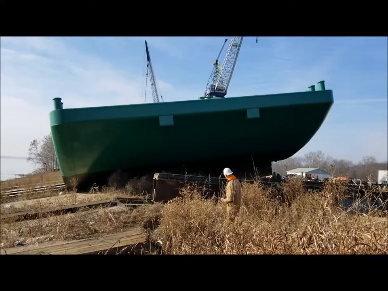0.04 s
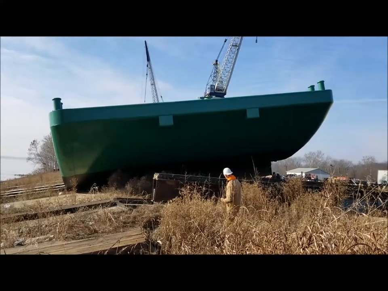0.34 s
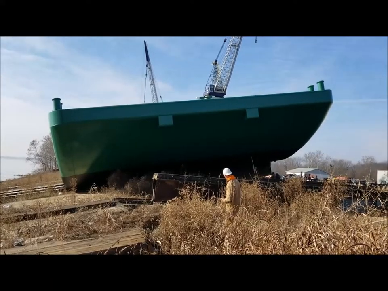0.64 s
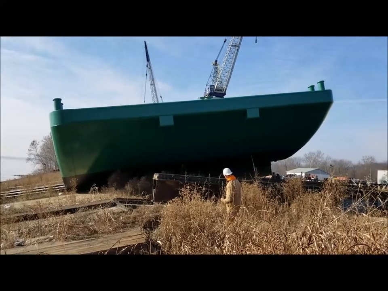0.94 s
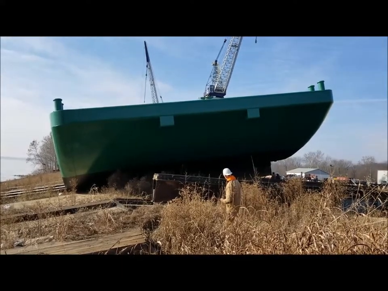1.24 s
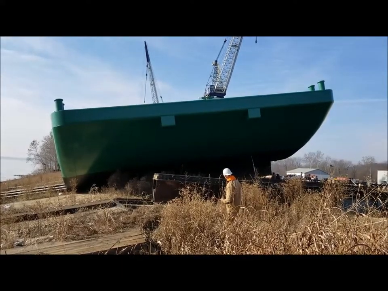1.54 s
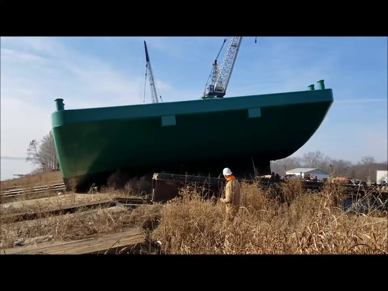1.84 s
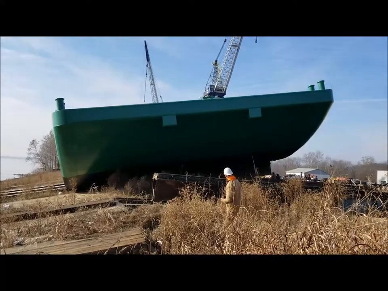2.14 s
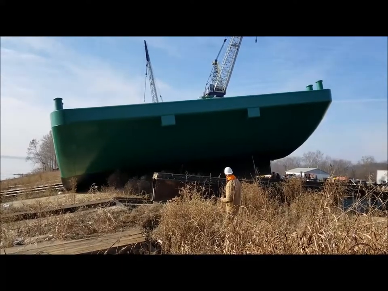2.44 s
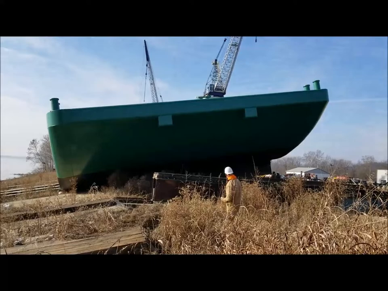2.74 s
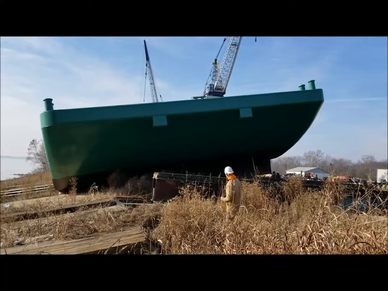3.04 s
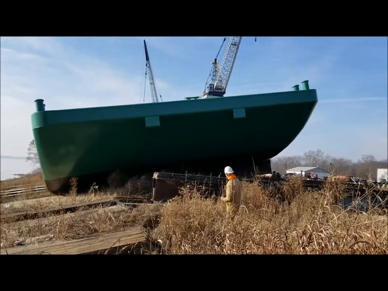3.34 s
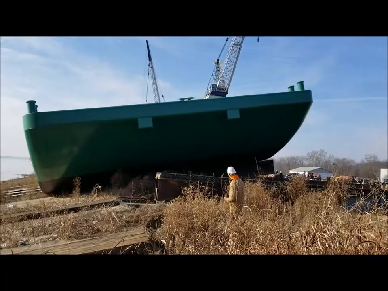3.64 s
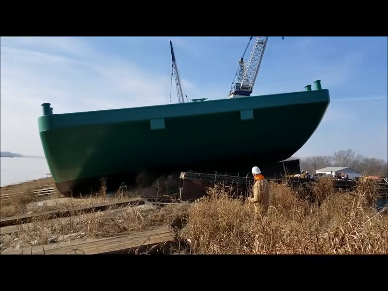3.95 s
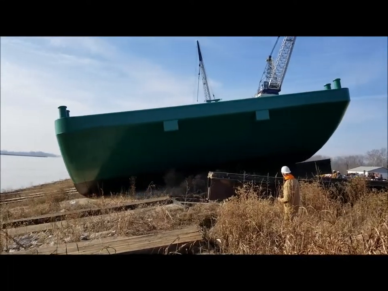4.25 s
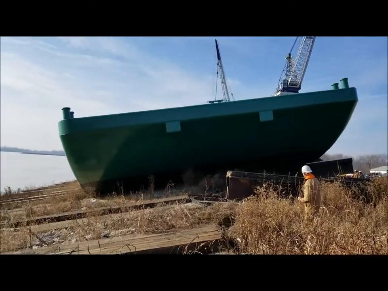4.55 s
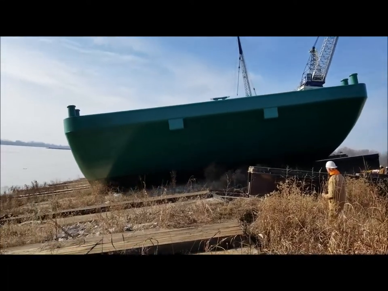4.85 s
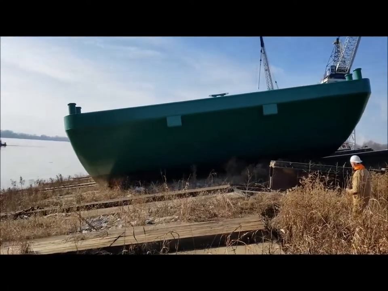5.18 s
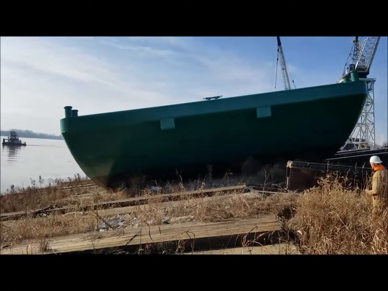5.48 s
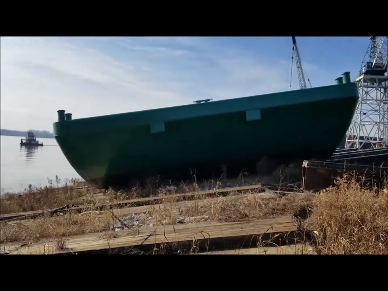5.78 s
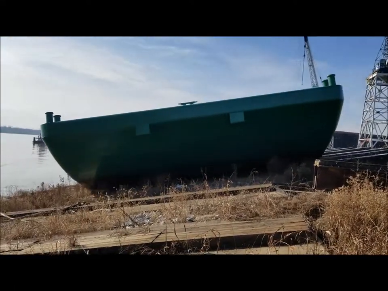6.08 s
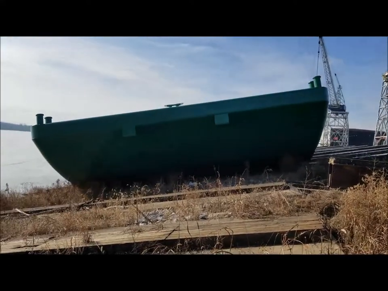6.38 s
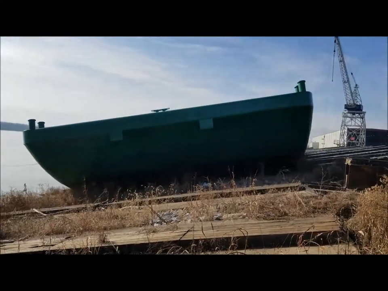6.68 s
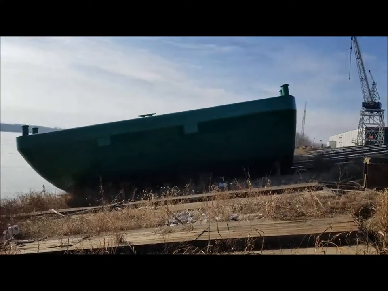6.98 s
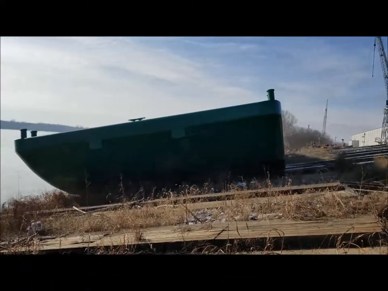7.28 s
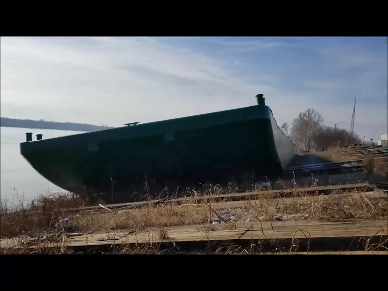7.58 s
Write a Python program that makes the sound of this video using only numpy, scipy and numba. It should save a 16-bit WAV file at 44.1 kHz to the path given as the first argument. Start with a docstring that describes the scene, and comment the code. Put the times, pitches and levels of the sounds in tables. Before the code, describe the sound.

A steel barge slides down timber ways with a thud, then a growing rumble, grinding scrapes and ringing bangs.

```python
"""Barge launch from a riverside yard.

A steel barge slides down timber ways, heard from the bank. Yard machinery hums; dry grass rustles close by.
The hull lets go with a thud. Stick-slip rumbles, grinds, scrapes and hisses, growing with speed and load.
Timbers crack; the hull bangs on them and its plates ring.
The left microphone is shaded: full bass, little treble, slightly late."""
import sys
import numpy as np
from scipy import signal
from scipy.fft import rfft, irfft, next_fast_len
from scipy.io import wavfile
from scipy.ndimage import uniform_filter1d, minimum_filter1d
from numba import njit

SR = 44100
rng = np.random.default_rng(int(sys.argv[2]) if len(sys.argv) > 2 else 0)


def generate_wav(sig):
    """Save sig (samples, or channels by samples) to the path in sys.argv[1] as 16-bit PCM at SR."""
    pcm = np.round(np.clip(np.atleast_2d(sig).T, -1, 1) * 32767).astype(np.int16)
    wavfile.write(sys.argv[1], SR, pcm)


N = 344862
TIME_S = np.arange(N) / SR

# noise spectra: f/Hz, relative density/dB
YARD_SPECTRUM = [(20, -31), (32, 4), (45, 8), (90, 3), (135, 3.5), (220, 0), (310, -5), (420, -10.5),
                 (700, -14.5), (1050, -17.5), (1450, -14), (2600, -21.5), (4800, -25.5), (8000, -30.5),
                 (16000, -45)]
BRUSH_SPECTRUM = [(800, -26), (2000, 3), (4000, 4), (6500, 2.5), (9000, -4.5), (16000, -18)]
CRACKLE_SPECTRUM = [(3000, -31), (7000, 10), (10000, 12), (14000, 7), (16000, -1)]
HISS_SPECTRUM = [(1500, -17), (4000, -1), (6000, 5), (8500, 2.5), (12000, 2.5), (16000, -5.5)]
GRIND_SPECTRUM = [(200, -39), (380, -4.5), (460, 0), (600, 3.5), (850, 2), (1050, -3), (1500, -7),
                  (2200, -16.5), (4000, -32)]
SCRAPE_SPECTRUM = [(700, -4), (1400, 0), (2200, 2.5), (3200, 2), (5500, -2), (8000, -5), (12000, -51)]
RUMBLE_SPECTRUM = [(20, -32), (35, -12), (55, -4), (100, 3), (150, 0), (200, -2), (250, -7), (330, -14),
                   (450, -27.5), (800, -43)]
SHUDDER_SPECTRUM = [(40, -25), (65, -14), (95, 1), (150, 0), (210, -1), (270, -13), (340, -16), (450, -30),
                    (800, -40)]
TREMOR_SPECTRUM = [(15, -42), (28, -4), (40, -1), (60, 4.5), (80, -1), (130, -43)]
# idling engine: f/Hz, level/dB
ENGINE_LINES = [(47.5, -51), (70, -44.5), (114, -49.5), (139, -47), (486, -57.5), (688, -63)]
# fan blade tones: harmonic, level/dB
FAN_HARMONICS = [(1, -38), (2, -50.5), (3, -62), (4, -52), (8, -63), (12, -63), (16, -68)]
# fan air noise: f/Hz, width/Hz, level/dB
FAN_BANDS = [(1460, 710, -56.5), (3570, 670, -59), (4940, 44, -79)]
# dry stalks: t/s, rise/s, brush/dB, crackle/dB, t60/s
RUSTLES = [(0.225, .004, -44, -62, 0.22), (0.772, 0.0035, -42, -48, 0.47), (0.905, .02, -60, -45, 0.17),
           (1.08, 0.044, -49, -49, 0.75), (1.21, 0.0021, -45.5, -46, 0.45), (1.342, .002, -58, -46, .08),
           (1.62, .04, -51, -55, 0.93), (1.823, 0.0017, -47, -41.5, 0.37), (1.975, .012, -45, -55, .3),
           (2.052, .004, -55, -43, 0.11), (2.104, .01, -40, -48, 0.22), (2.325, 0.013, -41, -45.5, 0.24),
           (2.57, .002, -38.5, -43, 0.16), (2.80, 0.005, -37.5, -40, 0.15), (3.06, 0.043, -41, -42, 0.74),
           (3.52, 0.044, -36, -36, 0.89), (4.33, 0.03, -22, -27, 0.24), (5.47, 0.036, -29, -27.5, 0.67)]
# hull speed on a log scale: t/s, level/dB
SPEED_CURVE = [(2.27, -69), (2.79, -62.5), (4.4, -50.5), (5.13, -52.5), (5.61, -49.5), (5.87, -48),
               (6.04, -46), (6.19, -45), (7.25, -47.5), (7.82, -45.5)]
# weight on the ways, jumping as the hull tips onto them: t/s, level/dB
LOAD_CURVE = [(2.03, -10), (2.35, -9), (2.8, -10.5), (3.2, -14), (3.62, -11.5), (3.69, -2), (4.1, 0),
              (4.55, -1.5), (5.15, 1.5), (6.0, 0), (6.8, 1), (7.82, -1)]
# deep tremor: t/s, level/dB
TREMOR_CURVE = [(2.0, -37.5), (2.9, -35), (3.2, -43.5), (4.1, -27), (4.6, -54), (5.85, -36), (6.2, -28),
                (6.5, -28), (6.78, -19.5), (7.0, -25), (7.82, -27)]
# pitch of the hull's boom: t/s, f/Hz
BOOM_CURVE = [(2.0, 135), (5.1, 107.3), (5.35, 144), (6.2, 110), (6.5, 168), (7.3, 160), (7.65, 234)]
# hull and plate resonances: f/Hz, width/Hz, relative gain/dB
HULL_MODES = [(75, 6, -6), (101, 9, -2), (157, 10, -10), (189, 12, -6), (316, 9, 0), (400, 20, -4),
              (835, 30, -10), (709, 16, -2), (976, 14, 1), (1477, 20, 0), (1720, 30, -5), (1929, 16, 3),
              (2273, 12, 1), (2617, 20, 0), (2898, 24, 1), (3275, 20, 0), (4069, 30, -4), (4172, 40, -5),
              (4918, 30, -4)]
# struck plate: ratio to plate pitch, level re clang/dB, t60/s
PLATE_MODES = [(1.001, -6, 0.49), (2.691, -14, 0.15), (3.8, -21, .2), (6.65, -23, 0.21)]
# cracking timber: f/Hz, level re crack/dB, t60/s
TIMBER_MODES = [(1940, -0.5, 0.1), (2580, -6, 0.091), (3420, -4, 0.071)]
# hull drops onto the ways: t/s, f/Hz, level/dB, t60/s
THUDS = [(2.037, 140, -7.5, 0.1), (3.65, 159, -13.5, 0.092), (3.712, 115, -1.5, 0.096),
         (3.824, 108.3, -3, 0.23), (4.734, 115, 4, 0.028), (5.564, 162.4, -7, 0.2), (6.924, 197, 10, 0.023),
         (6.953, 99, -1, 0.14), (7.39, 146, -4, 0.067)]
# timbers crack under load: t/s, rise/s, level/dB
CRACKS = [(2.017, .0033, -39.5), (2.10, .012, -44.5), (2.567, 0.0031, -37.5), (2.799, 0.00616, -41),
          (6.916, .012, -26.5), (7.383, .009, -35.5)]
# hull hits timber: t/s, rise/s, boom/dB, clang/dB, crack/dB, splinter/dB, plate/Hz, shudder/dB, lift/s
BANGS = [(3.639, .012, -52, -15, -22.5, -26.5, 728, -20, 0.31),
         (4.012, .008, -25, -25.5, -35, -55, 978, -35, 0.31),
         (4.731, 0.013, -9, -15, -11.5, -20, 935, -7, 0.32),
         (5.561, .017, -10.5, -11.5, -15.5, -24.5, 680, -11.5, 0.16),
         (6.614, 0.0069, -11, -12.5, -17.5, -30, 860, -21.5, 0.041),
         (7.549, .004, -17.5, -24.5, -24, -36, 1345, -21, 0.067),
         (7.63, .008, -29, -32, -31, -49.5, 1335, -31, .05)]
# half-octave bands of a blow: f/Hz, relative level/dB, t60/s
BLOW_BANDS = [(50, -40, 0.52), (101, -10, 0.95), (159, -3, 0.35), (279, -13, 1), (420, -14, 1),
              (590, -4.5, 0.32), (760, -3, 0.58), (1080, -7.5, 0.57), (1700, -3, 0.38), (3150, -0.5, 0.24),
              (4640, -1, 0.22), (6500, -6, 0.071), (9000, -25, .12), (14000, -12, .1)]
# left microphone re right: f/Hz, gain/dB, coherence/0-1, lag/rad
LEFT_RESPONSE = [(39.7, 1, 0.95, .03), (217, 4.5, 1, 0.11), (374, 6, 0.82, 0.88), (435, 2.5, 1, 1.58),
                 (700, -1, 0.91, 1.33), (891, 3.5, 0.92, 1.97), (1250, -2.5, 0.18, 3.1),
                 (1830, -6, 0.17, 3.2), (2290, -13.5, 0, 7.4), (3180, -18.5, 0, 3.8), (5530, -18, 0, 2.8),
                 (9000, -20, 0, 16), (15000, -9, .05, 16)]
# right microphone port: f/Hz, width/Hz, depth/0-1
PORT_DIPS = [(6760, 1160, 0.66), (9380, 3770, 0.74), (10380, 940, 0.8)]

# friction laws: base/dB, dB per speed dB, dB per load dB, slope after AWAY_S/(dB/s)
HISS_LAW = (-32, 1.0, 0.02, -1)
GRIND_LAW = (-31, 0.22, 1.3, -4.5)
SCRAPE_LAW = (-40, 0.15, 1.5, -1.5)
RUMBLE_LAW = (-16, 0.33, 1.06, 0.4)
RELEASE_S, AWAY_S = LOAD_CURVE[0][0], 6.95  # hull lets go, draws away
# boom, clang, crack, splinter
REGISTERS_HZ, CRACK_REGISTERS_DB = (170, 750, 2000, 4400), (11, -1, 3.5, 0)


def amp(db):
    """Decibels to gain."""
    return 10 ** (np.asarray(db) / 20)


def unit_rms(x):
    """Scale to unit power."""
    return x / np.sqrt(np.mean(x ** 2) + 1e-20)


def since(start_s):
    """Seconds since start_s, zero before."""
    return np.maximum(TIME_S - start_s, 0)


def curve_db(rows):
    """Level over time, silent before the first row."""
    return np.interp(TIME_S, *np.transpose(rows), left=-150)


def at_hz(rows, hz):
    """Table columns interpolated over log frequency."""
    points_hz, *columns = np.transpose(rows)
    return [np.interp(np.log(hz + 1e-9), np.log(points_hz), column) for column in columns]


def drift(rate_hz):
    """Slow random wander, unit RMS."""
    hop, settle = 40, 2000
    pole = np.exp(-2 * np.pi * rate_hz * hop / SR)
    noise = rng.standard_normal(N // hop + settle + 2)
    slow = signal.lfilter([1], [1, -2 * pole, pole * pole], noise)[settle:]
    return np.interp(np.arange(N) / hop, np.arange(len(slow)), unit_rms(slow))


def padded_fft(x):
    """Bin frequencies and zero-padded transform."""
    size = 2 * next_fast_len(N // 2 + 2048)
    return np.arange(size // 2 + 1) * SR / size, rfft(x, size)


def colour(x, spectrum):
    """Shape to a spectrum, unit RMS."""
    hz, bins = padded_fft(x)
    gain = amp(at_hz(spectrum, hz)[0]) * (hz < 2 * spectrum[-1][0])
    return unit_rms(irfft(bins * gain)[:, :N])


def resonate(x, hz, width_hz):
    """Resonator, unity peak gain."""
    radius = np.exp(-np.pi * width_hz / SR)
    feedback = [1, -2 * radius * np.cos(2 * np.pi * hz / SR), radius ** 2]
    return signal.lfilter(np.array([1, 0, -1]) * (1 - radius ** 2) / 2, feedback, x)


@njit
def swept_resonance(x, hz, width_hz):
    """Resonator with a per-sample centre frequency."""
    out = np.zeros(len(x))
    radius = np.exp(-np.pi * width_hz / SR)
    state = 0j
    for i in range(len(x)):
        state = state * radius * np.exp(2j * np.pi * hz[i] / SR) + x[i]
        out[i] = state.real
    return out


def slips(per_s, spread_db):
    """Random micro-slips of uneven size; rows: direct, scattered."""
    sizes = amp(spread_db * np.minimum(rng.exponential(1, (2, N)), 5))
    hits = rng.random((2, N)) < per_s / SR
    return unit_rms(hits * sizes * rng.choice([-1, 1], (2, N)))


def to_mics(pair, scatter, left_treble_db, shelf_hz=2300):
    """Right: the direct row. Left: a late, shaded copy blended with the scattered row."""
    hz, (direct, scattered) = padded_fft(pair)
    left_db, coherence, lag_rad = at_hz(LEFT_RESPONSE, hz)
    coherence = np.clip(coherence, 0.001, 1) ** scatter
    shelf = hz ** 4 / (hz ** 4 + shelf_hz ** 4)
    blend = coherence * direct * np.exp(-1j * lag_rad) + np.sqrt(1 - coherence ** 2) * scattered
    left = amp(left_db + left_treble_db * shelf) * blend
    return irfft([left, direct])[:, :N]


def machine_tones(lines, wander_hz, flutter_db):
    """Sines wavering in pitch and level."""
    out = np.zeros((2, N))
    for hz, db in lines:
        cycles = hz * TIME_S + wander_hz * np.cumsum(drift(2.69)) / SR + rng.random()
        out[0] += np.sqrt(2) * amp(db + flutter_db * drift(4.6)) * np.sin(2 * np.pi * cycles)
    return out


def yard(blade_hz=299.5):
    """Idling engine and whining fan over a distant wash."""
    wash = amp(-37.5) * colour(rng.standard_normal((2, N)), YARD_SPECTRUM)
    for hz, width_hz, db in FAN_BANDS:
        air = resonate(resonate(rng.standard_normal((2, N)), hz, width_hz), hz, width_hz)
        wash += amp(db + 1.2 * drift(6)) * unit_rms(air)
    fan = machine_tones([(k * blade_hz, db) for k, db in FAN_HARMONICS], wander_hz=0.23, flutter_db=1)
    engine = machine_tones(ENGINE_LINES, wander_hz=2.35, flutter_db=2.5)
    machines = to_mics(fan + engine, scatter=1, left_treble_db=-26)
    return to_mics(wash, scatter=4, left_treble_db=4.5) + machines


def grass():
    """Nearby dry stalks brush and crackle in bursts."""
    gains = np.zeros((2, N))
    for start_s, rise_s, brush_db, crackle_db, t60_s in RUSTLES:
        start = int(start_s * SR)
        age_s = TIME_S[:min(SR, N - start)]
        envelope = amp(-60 * age_s / t60_s) * (1 - np.exp(-age_s / rise_s))
        gains[:, start:start + len(age_s)] += amp([[brush_db], [crackle_db]]) * envelope
    brush = gains[0] * colour(slips(per_s=8500, spread_db=1), BRUSH_SPECTRUM)
    crackle = gains[1] * colour(slips(per_s=4400, spread_db=3.5), CRACKLE_SPECTRUM)
    return to_mics(brush + crackle, scatter=1.1, left_treble_db=-30)


def friction_gain(law):
    """Friction follows speed and load, then ramps as the hull draws away."""
    base_db, per_speed, per_load, away_db_per_s = law
    points_s, points_db = np.transpose(SPEED_CURVE)
    speed_db = np.interp(TIME_S, points_s, points_db - points_db.max())
    db = base_db + per_speed * speed_db + per_load * curve_db(LOAD_CURVE) + away_db_per_s * since(AWAY_S)
    return (TIME_S > RELEASE_S) * amp(db)


def hull_ring(x, ring_db):
    """Excitation plus the plate ringing it drives."""
    return x + sum(amp(db + ring_db) * resonate(x, hz, width_hz) for hz, width_hz, db in HULL_MODES)


def strain(build_s=0.21):
    """Strain, 0-1: builds towards each bang, most before the hardest, and ends with it."""
    cracks = [(bang_s, crack_db) for bang_s, _, _, _, crack_db, *_ in BANGS]
    hardest_db = max(db for _, db in cracks)
    swells = [(TIME_S < bang_s) * amp(db - hardest_db) * np.exp(-((bang_s - TIME_S) / build_s) ** 4)
              for bang_s, db in cracks]
    return np.max(swells, axis=0)


def lift():
    """Each bang briefly lifts the hull off the timber: 1 lifted, 0 settled."""
    lifts = [(TIME_S > bang_s) * np.exp(-(since(bang_s) / lift_s) ** 4) for bang_s, *_, lift_s in BANGS]
    return np.max(lifts, axis=0)


def shudder(peak_s=0.071):
    """Envelope of hull shake: swells and dies after each bang."""
    return sum(amp(db) * since(bang_s) / peak_s * np.exp(1 - since(bang_s) / peak_s)
               for bang_s, *_, db, _ in BANGS)


def hiss():
    """Grit and grass crushed on the ways fizz more with speed."""
    gain = friction_gain(HISS_LAW) * amp(0.75 * drift(14))
    fizz = colour(slips(per_s=14000, spread_db=2.5), HISS_SPECTRUM)
    return to_mics(gain * fizz, scatter=1.7, left_treble_db=-2)


def sliding(shudder_db=-28, strain_db=4, lift_db=-8):
    """Stick-slip under the hull: coarse slips grind, fine ones scrape."""
    judder = drift(13.5)
    grind_gain = np.hypot(friction_gain(GRIND_LAW), amp(shudder_db) * shudder()) * amp(1 + 1.75 * judder)
    scrape_db = 5 + strain_db * strain() + lift_db * lift() + 0.47 * judder
    scrape_gain = friction_gain(SCRAPE_LAW) * amp(scrape_db)
    grind = grind_gain * colour(slips(per_s=1800, spread_db=-0.5), GRIND_SPECTRUM)
    scrape = scrape_gain * colour(slips(per_s=8300, spread_db=1.5), SCRAPE_SPECTRUM)
    return to_mics(hull_ring(grind + scrape, ring_db=-6.5), scatter=0.33, left_treble_db=4)


def rumble(boom_width_hz=29.5):
    """Heavy slips and bangs shake the hull; its boom shifts in pitch above a deep tremor."""
    gain = friction_gain(RUMBLE_LAW) * amp(0.6 * drift(3.5))
    shake = amp(-4.5) * gain * colour(slips(per_s=1500, spread_db=1.46), RUMBLE_SPECTRUM)
    jolts = amp(-3.5) * shudder() * colour(slips(per_s=1500, spread_db=2), SHUDDER_SPECTRUM)
    boom_hz = np.interp(TIME_S, *np.transpose(BOOM_CURVE))
    drive = colour(slips(per_s=1500, spread_db=-0.4), RUMBLE_SPECTRUM)
    swept = np.array([swept_resonance(row, boom_hz, boom_width_hz) for row in drive])
    boom = amp(-6.5) * gain * unit_rms(swept)
    tremor = amp(curve_db(TREMOR_CURVE)) * colour(slips(per_s=1100, spread_db=3), TREMOR_SPECTRUM)
    hull = hull_ring(shake + jolts, ring_db=-1)
    return to_mics(hull + boom + tremor, scatter=1.33, left_treble_db=-0.5)


def thuds(rise_s=0.0048):
    """Each soft, heavy contact swings one low hull mode."""
    age_s, out = TIME_S[:SR], np.zeros((2, N + SR))
    for start_s, hz, db, t60_s in THUDS:
        start = int(start_s * SR)
        envelope = amp(db - 60 * age_s / t60_s) * (1 - np.exp(-age_s / rise_s))
        out[0, start:start + SR] += envelope * np.sin(2 * np.pi * hz * age_s)
    return out[:, :N]


def mode_clusters(count=7, spread_hz=75, attack_s=0.0019):
    """Struck plates and cracking timbers ring in close modes that beat as they die."""
    rings = [(bang_s + rise_s / 2, plate_hz * ratio, clang_db + db, t60_s)
             for bang_s, rise_s, _, clang_db, _, _, plate_hz, _, _ in BANGS
             for ratio, db, t60_s in PLATE_MODES]
    rings += [(crack_s + rise_s, hz, crack_db + db, t60_s)
              for crack_s, rise_s, crack_db in CRACKS for hz, db, t60_s in TIMBER_MODES]
    age_s, out = TIME_S[:SR], np.zeros((2, N + SR))
    for start_s, hz, db, t60_s in rings:
        modes_hz = hz + spread_hz * (np.linspace(-1, 1, count) + rng.normal(0, 0.099, count))
        cluster = np.sin(2 * np.pi * (modes_hz[:, None] * age_s + rng.random((count, 1)))).sum(axis=0)
        envelope = amp(db - 60 * age_s / t60_s) * (1 - np.exp(-age_s / attack_s))
        start = int(start_s * SR)
        out[0, start:start + SR] += envelope * unit_rms(cluster)
    return out[:, :N]


def strikes(afterknock_s=0.033, afterknock_db=-8):
    """Bangs, their weaker afterknocks and cracks: t/s, rise/s, register levels/dB."""
    bangs = [(start_s, rise_s, np.array(levels_db)) for start_s, rise_s, *levels_db, _, _, _ in BANGS]
    afterknocks = [(start_s + afterknock_s, rise_s, db + afterknock_db) for start_s, rise_s, db in bangs]
    cracks = [(start_s, rise_s, db + np.array(CRACK_REGISTERS_DB)) for start_s, rise_s, db in CRACKS]
    return bangs + afterknocks + cracks


def blow_envelope(age_s, rise_s, t60_s, snap_db=1.5, snap_s=0.022):
    """Linear rise, fast first drop, exponential ring-out."""
    decay_s = np.maximum(age_s - rise_s, 0)
    return np.minimum(age_s / rise_s, 1) * amp(snap_db * np.exp(-decay_s / snap_s) - 60 * decay_s / t60_s)


def blows():
    """Each blow is a crush of contacts, decaying per half octave; treble dies first."""
    contacts = [slips(per_s=3500, spread_db=2) for _ in range(2)]
    edges_hz = 40 * 2 ** np.arange(0, 9, 0.5)
    out = np.zeros((2, N))
    for k, (low_hz, high_hz) in enumerate(zip(edges_hz, edges_hz[1:])):
        centre_hz = np.sqrt(low_hz * high_hz)
        band_db, t60_s = at_hz(BLOW_BANDS, centre_hz)
        power = np.zeros(N)
        for start_s, rise_s, levels_db in strikes():
            start = int(start_s * SR)
            age_s = TIME_S[:min(int(t60_s * SR), N - start)]
            gain = amp(band_db + np.interp(np.log(centre_hz), np.log(REGISTERS_HZ), levels_db))
            power[start:start + len(age_s)] += (gain * blow_envelope(age_s, rise_s, t60_s)) ** 2
        bandpass = signal.butter(2, [low_hz, high_hz], "band", fs=SR, output="sos")
        out += np.sqrt(power) * unit_rms(signal.sosfilt(bandpass, contacts[k % 2]))
    return amp(-5.5) * hull_ring(out, ring_db=4.5)


def scene():
    """The launch, with the yard behind and grass in front."""
    impacts = to_mics(blows() + thuds() + mode_clusters(), scatter=0.69, left_treble_db=-8)
    return yard() + rumble() + sliding() + hiss() + impacts + grass()


def limit(x, release_db_per_s=220):
    """Full-scale peak limiter: fast attack, release linear in dB."""
    over_db = np.maximum(20 * np.log10(np.abs(x).max(axis=0) + 1e-9), 0)
    ramp_db = release_db_per_s * TIME_S
    reduction_db = np.maximum.accumulate(over_db + ramp_db) - ramp_db
    return x * uniform_filter1d(minimum_filter1d(amp(-reduction_db), size=129), size=129)


def record(dry):
    """Right-port treble dips, 19 Hz high-pass, limiter, 15.8 kHz low-pass."""
    left, right = dry
    for hz, width_hz, depth in PORT_DIPS:
        right = right - depth * resonate(right, hz, width_hz)
    highpass = signal.butter(4, 19, "high", fs=SR, output="sos")
    lowpass = signal.ellip(12, 0.1, 80, 15800, fs=SR, output="sos")
    return signal.sosfilt(lowpass, limit(signal.sosfilt(highpass, [left, right])))


dry = scene()
out = record(dry)
generate_wav(out)
```